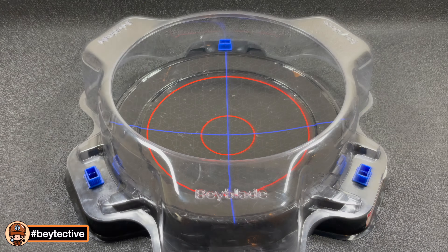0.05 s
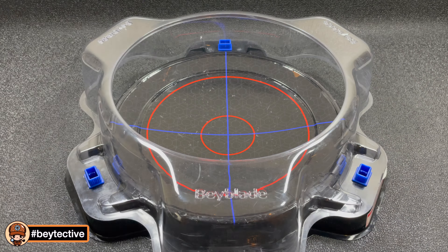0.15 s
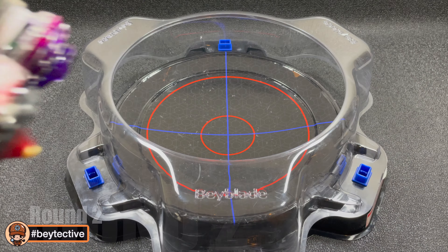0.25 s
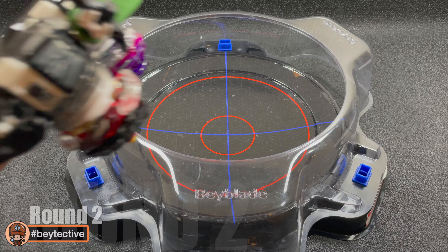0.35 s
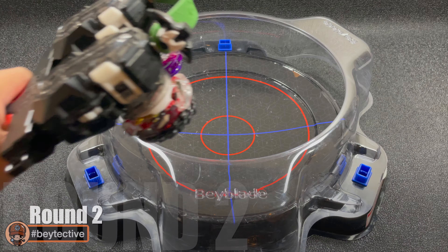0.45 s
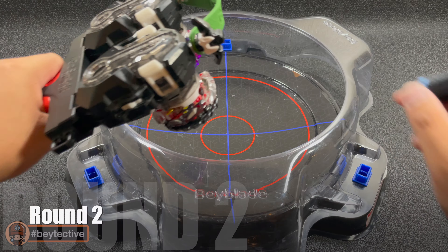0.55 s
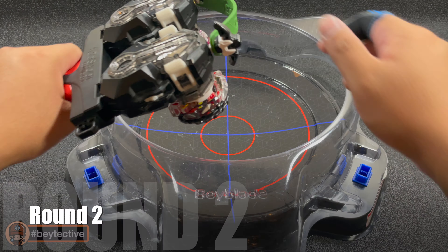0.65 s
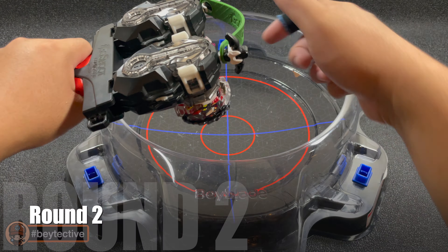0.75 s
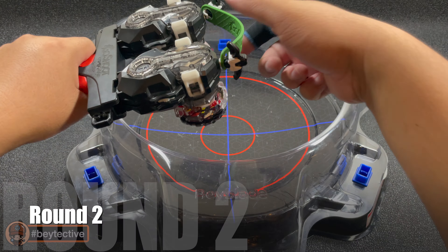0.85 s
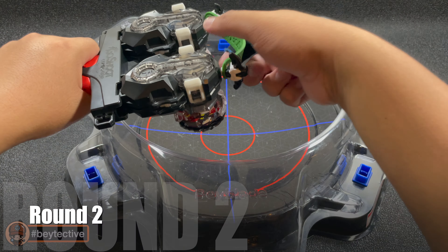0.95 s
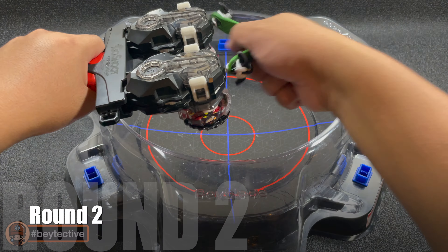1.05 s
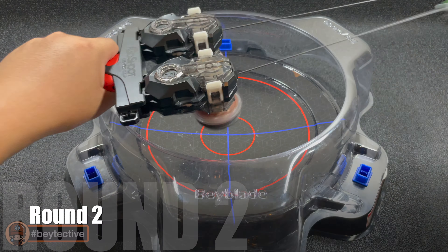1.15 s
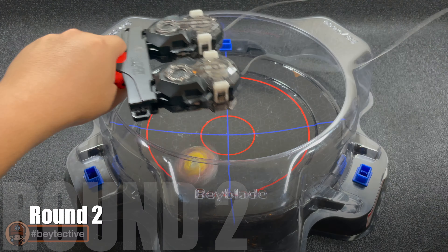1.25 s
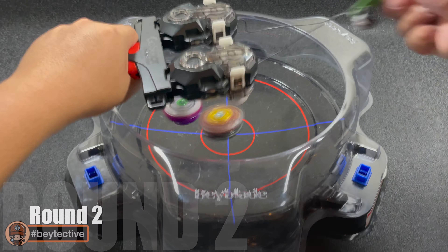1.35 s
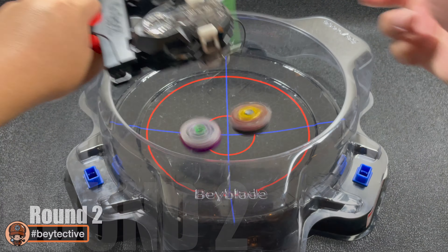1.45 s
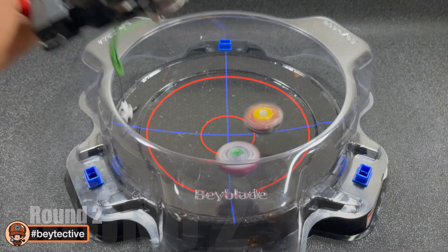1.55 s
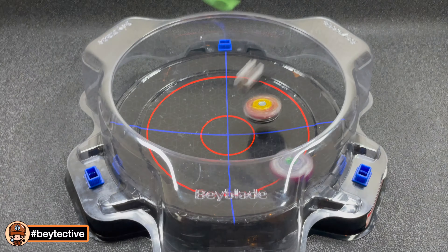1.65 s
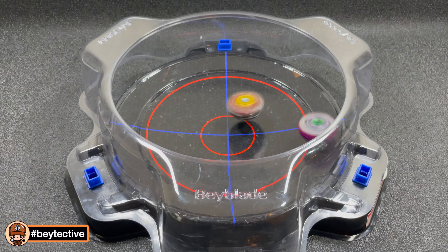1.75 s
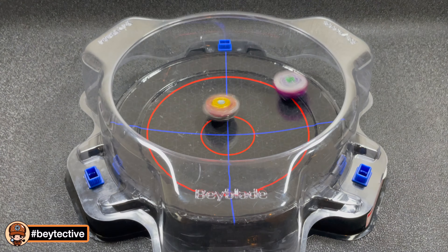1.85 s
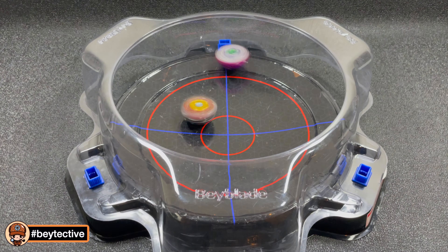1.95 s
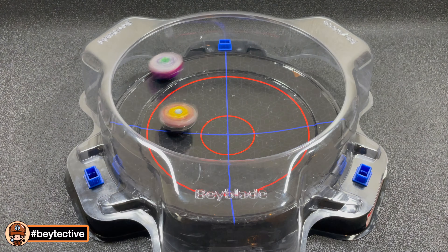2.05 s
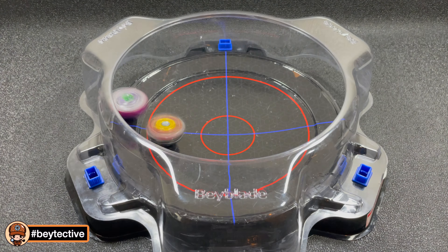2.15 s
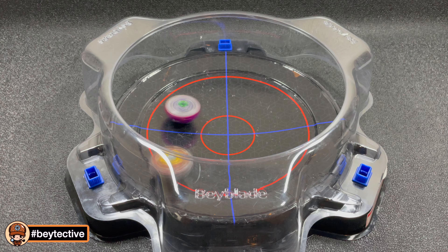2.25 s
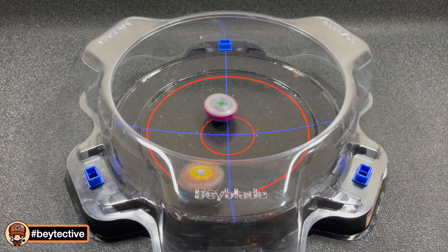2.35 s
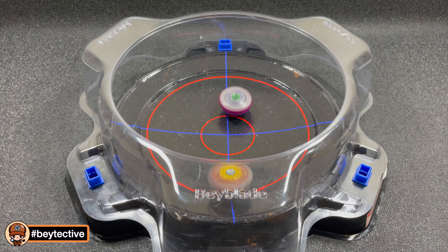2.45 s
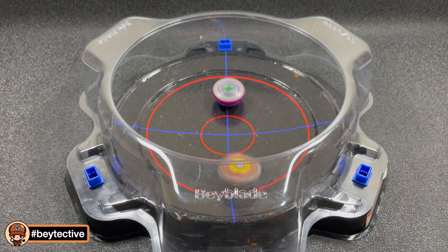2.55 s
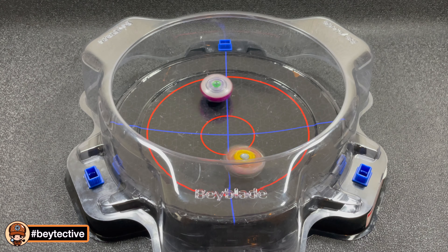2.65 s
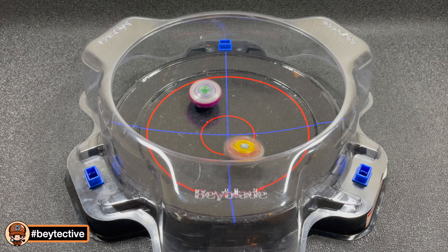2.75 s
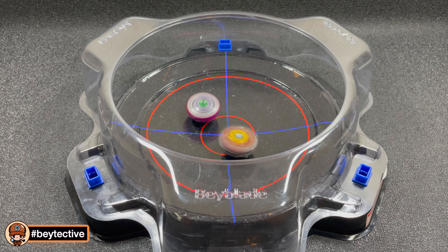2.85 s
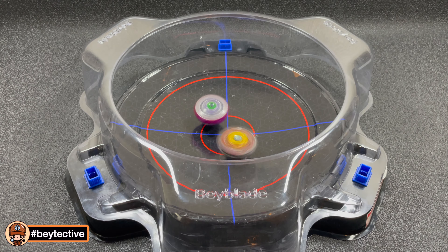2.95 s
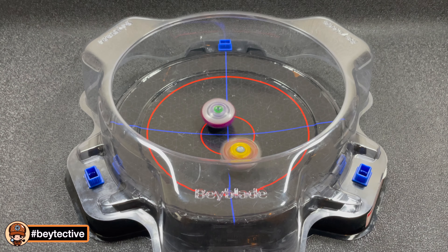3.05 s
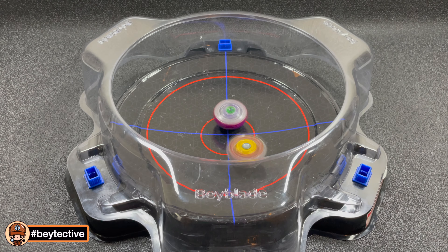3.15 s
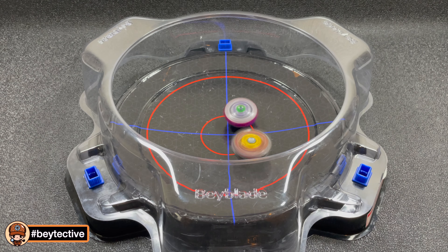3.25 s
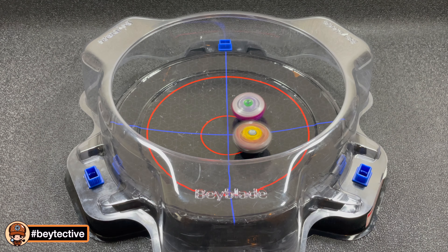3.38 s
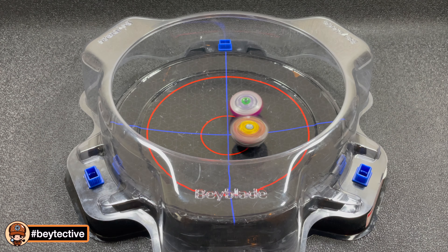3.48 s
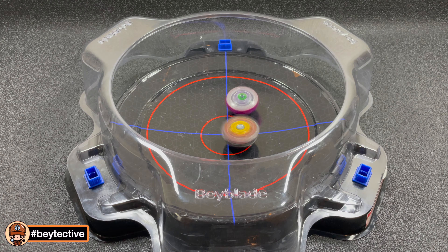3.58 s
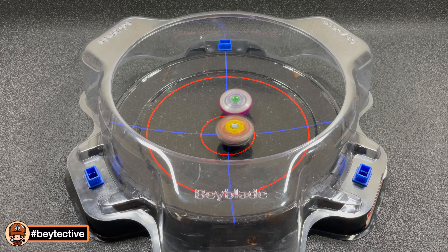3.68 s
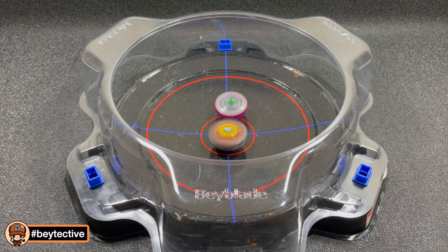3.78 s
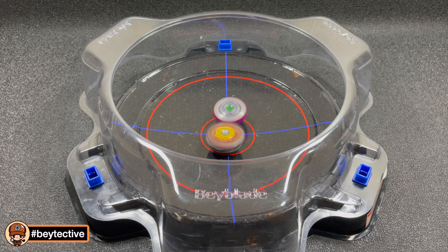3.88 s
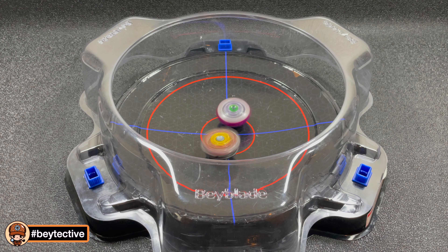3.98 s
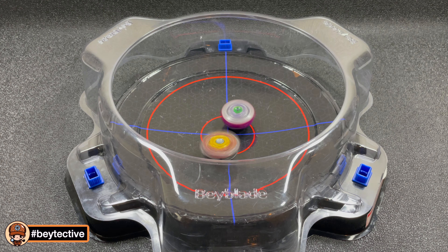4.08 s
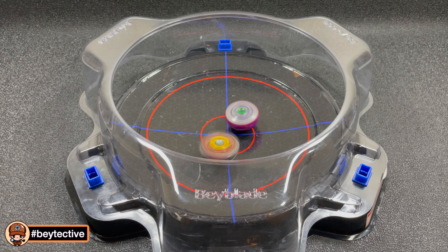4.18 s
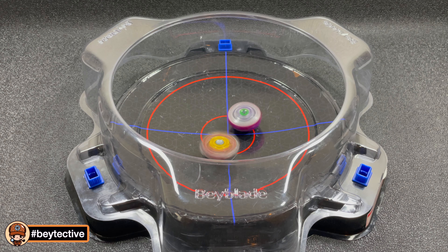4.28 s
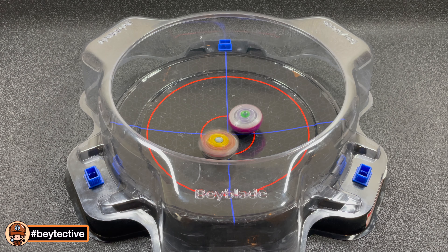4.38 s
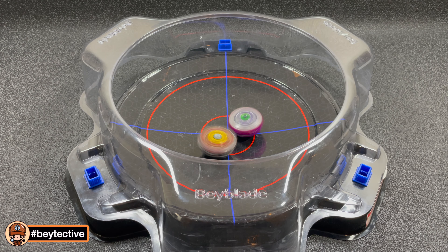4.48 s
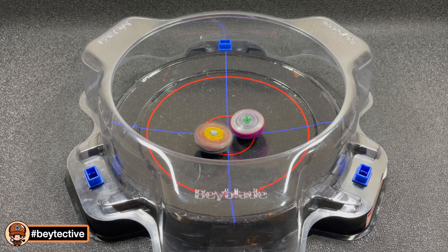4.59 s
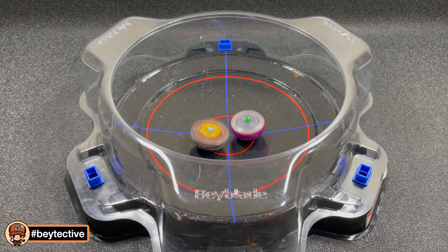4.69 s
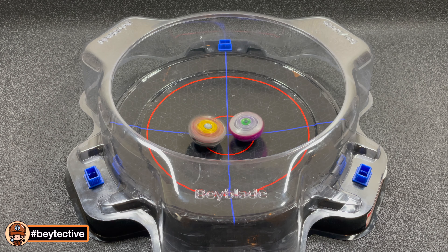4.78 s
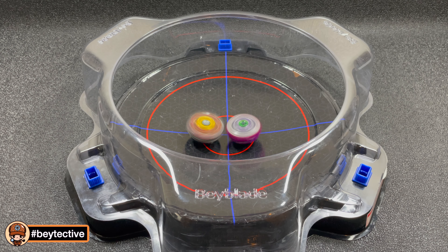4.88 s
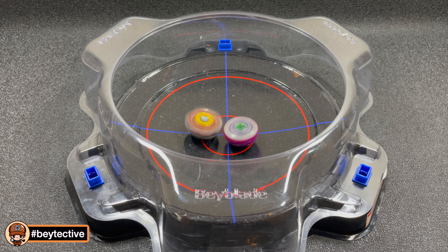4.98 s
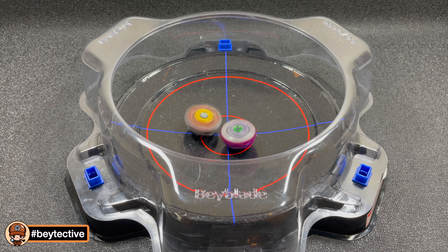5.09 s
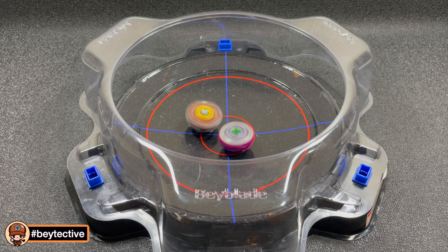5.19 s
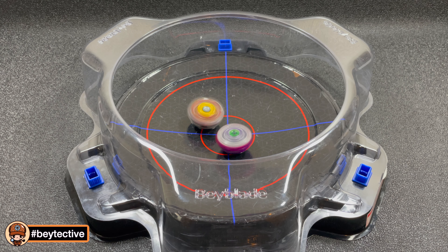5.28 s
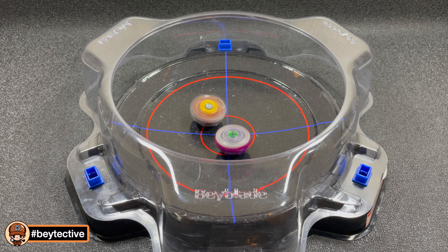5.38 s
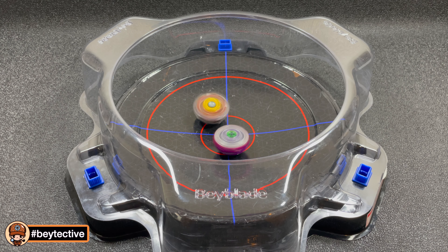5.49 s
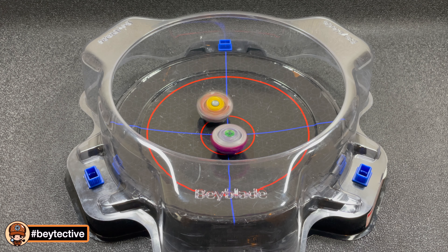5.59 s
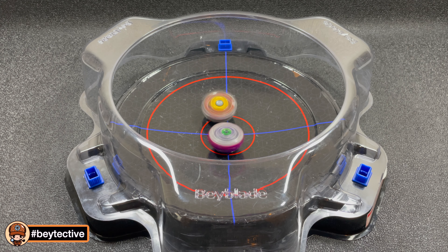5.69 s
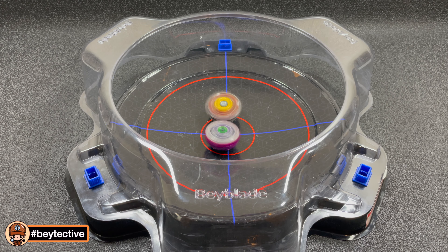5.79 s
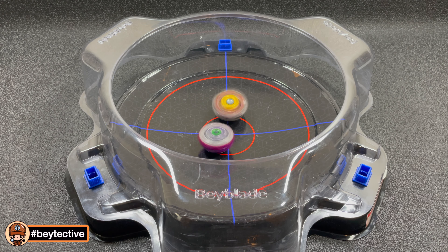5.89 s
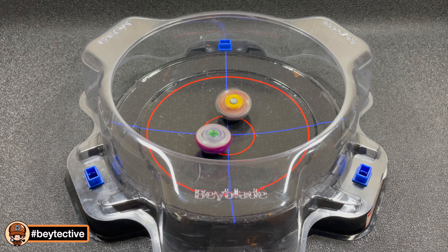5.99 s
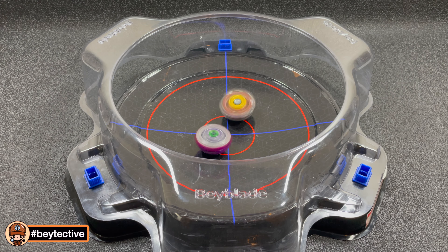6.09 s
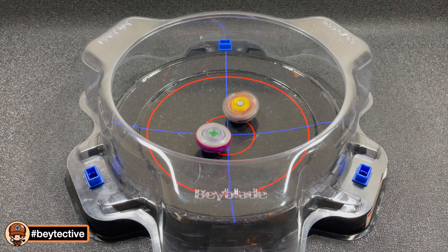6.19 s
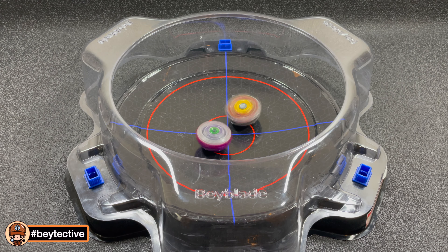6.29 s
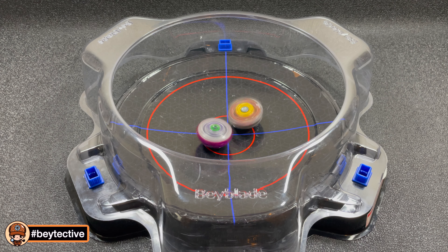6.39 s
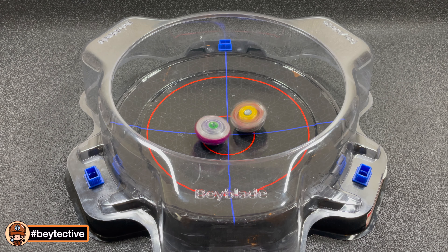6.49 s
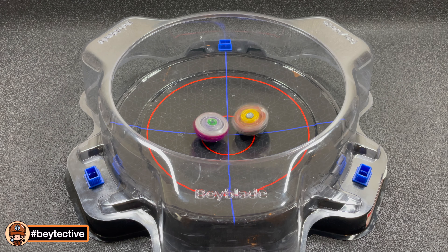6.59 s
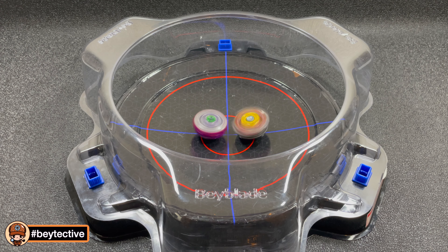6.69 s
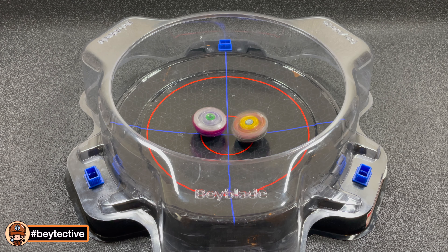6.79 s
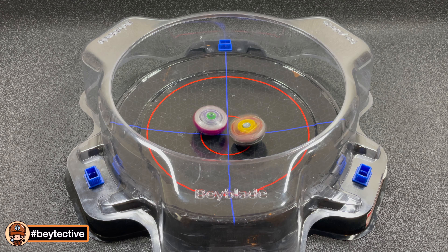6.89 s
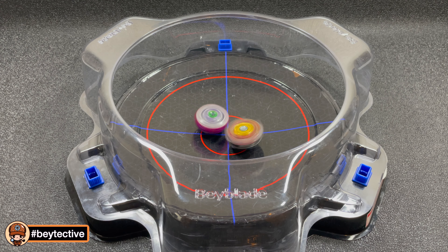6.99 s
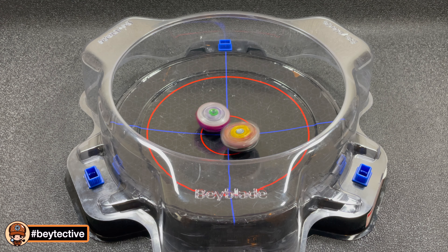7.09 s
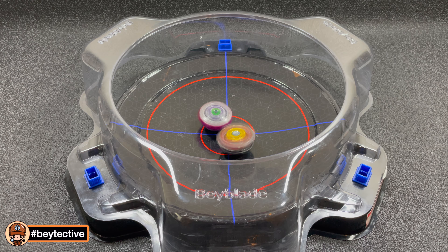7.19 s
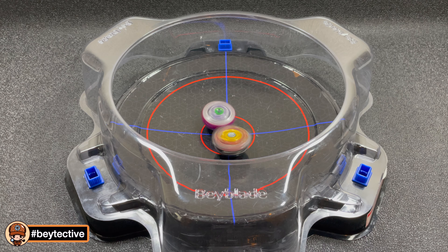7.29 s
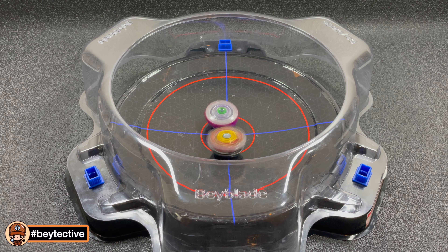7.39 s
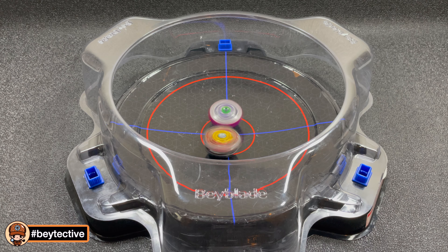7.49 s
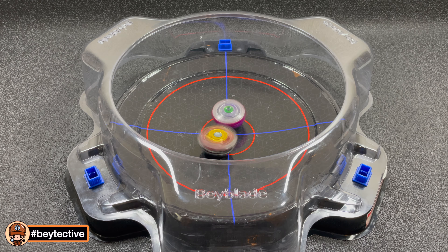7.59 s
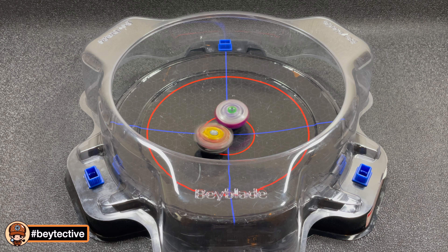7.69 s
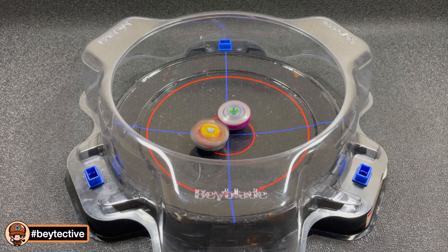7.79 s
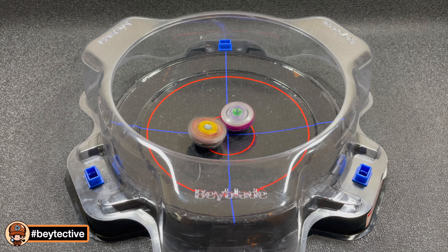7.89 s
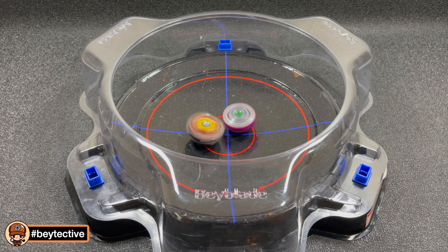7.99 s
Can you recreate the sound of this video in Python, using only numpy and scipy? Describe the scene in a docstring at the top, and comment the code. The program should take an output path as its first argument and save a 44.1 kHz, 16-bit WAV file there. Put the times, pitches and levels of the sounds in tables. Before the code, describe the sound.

After a short zipping rip of cord, spinning tops boom against plastic walls, then clash in bright metallic cracks that grow lighter over a low rumble.

```python
"""A few small plastic clicks, then two toy tops are ripped off a geared string launcher in a small room.
A spring winds the cord back as they land in a thin plastic arena, whose ringing modes boom at each knock.
The tops skid, rumble and scrape on tips that catch once a turn, and clack their metal rims together:
bursts of noise with a short ring, lighter on the whole as they slow. Faint air and hum lie beneath."""
import sys
import numpy as np
from scipy import signal
from scipy.fft import rfft, irfft
from scipy.io import wavfile
from scipy.ndimage import uniform_filter1d

SR = 44100
rng = np.random.default_rng(int(sys.argv[2]) if len(sys.argv) > 2 else 0)


def log_audio(samples):
    """Write samples as a 16-bit WAV file to the path given in sys.argv[1]."""
    # one column per channel
    frames = np.atleast_2d(samples).T
    # limit to full scale, then quantise
    limited = np.clip(frames, -1, 1)
    pcm = np.round(limited * 32767).astype(np.int16)
    wavfile.write(sys.argv[1], SR, pcm)


N = 354563
TIME = np.arange(N) / SR  # the whole scene, in seconds
RING = TIME[:SR // 4]  # the quarter second given to each blow


# rim against rim; the thump goes through the tips: start_s, crack_db, thump_db, ring_db, ring_hz
CLASHES = [(2.1873, -14.5, -43, -31, 6400), (2.9328, -17, -38.5, -33, 5870), (3.5217, -24, -38, -53, 4250),
           (3.7368, -25, -42.5, -35.5, 4460), (3.9235, -23.5, -49.5, -33, 5110),
           (4.5574, -28, -39.5, -37, 4300), (4.9263, -35.5, -60.5, -47.5, 4244),
           (5.838, -24.5, -47, -33.5, 4576), (6.462, -28.5, -44, -43.5, 4730),
           (6.9805, -31.5, -50.5, -43, 5640), (7.3181, -35.5, -80, -47, 5460),
           (7.3654, -38.5, -65, -61, 5000), (7.449, -35.5, -65, -55, 5020), (7.879, -32, -52, -49, 4710),
           (7.9287, -42.5, -68, -55.5, 4890), (7.9885, -36.5, -52, -46, 4760)]
# spectrum of the metal crack: pitch_hz, level_db
CLASH_COLOUR = [(150, -11), (450, -8.5), (750, -7.5), (1300, -8.5), (2200, -7), (3100, -8), (4700, 0.5),
                (6200, -1), (7600, -3), (10300, -0.5), (12000, -1), (14000, -2.5), (16000, -9.5)]


def clashes():
    """Metal rims meet: a bright crack, a brief ring of the rim, and a thump down the tips into the floor."""
    out = np.zeros(N)
    for start_s, crack_db, thump_db, ring_db, ring_hz in CLASHES:
        # the first touch is the hardest
        first_touch = 1 + 0.34 * fade(t60=0.0067, hold=0.00083)
        contact = burst(t60=0.056, hold=0.00081) * first_touch
        crack = attack(colour(contact * push(grind_s=0.0011), CLASH_COLOUR))
        rim_modes = burst(t60=0.074) + undb(-18) * burst(t60=.16)
        ring = attack(narrow(rim_modes, ring_hz, width_hz=650))
        thump = shell(centre_hz=470, width_hz=130, grind_s=0.0038)
        add(out, start_s, undb(crack_db) * crack + undb(ring_db) * ring + undb(thump_db) * thump)
    return out


# a top against the arena floor or wall; centre and width pick the shell modes that boom:
# start_s, boom_db, centre_hz, width_hz, crack_db, grind_s
KNOCKS = [(1.277, -20.5, 380, 200, -30, .002), (1.306, -18.5, 319.3, 200, -27, .008),
          (1.512, -39, 1160, 800, -21.5, .002), (1.522, -22, 392, 197, -30, .003),
          (1.533, -27.5, 520, 309.3, -24.5, .003), (1.582, -21.5, 693, 306.4, -22, .002),
          (1.666, -37.5, 775, 498, -33.5, .006), (1.692, -30.5, 345.3, 160, -35.5, .004),
          (1.77, -40, 250.9, 410.3, -40, .005), (1.803, -38, 491.2, 300, -39.5, .004),
          (1.865, -35.5, 413.3, 197.4, -34.5, .005), (1.931, -34.5, 515.8, 303.1, -35, .003),
          (2.017, -14.5, 698.5, 60, -19.5, .012), (2.029, -19, 660, 80.8, -21.5, .003),
          (2.149, -17.5, 831, 296.4, -18, .005), (2.156, -21.5, 620, 130, -25.5, .005),
          (2.158, -21, 1110, 91.2, -26.5, .004), (2.171, -19.5, 543.8, 70, -27.5, .006),
          (2.309, -39.5, 330, 400, -37.5, .008), (2.347, -46.5, 400, 400, -42.5, .004),
          (2.403, -40, 297, 304, -41.5, .005), (2.437, -37.5, 390, 300, -43.5, .005),
          (3.012, -35.5, 240, 140, -36.5, .004)]
# spectrum of the crack of a rim on plastic: pitch_hz, level_db
CRACK_COLOUR = [(100, -12), (500, 2), (1500, 1), (2800, 1), (4500, 3), (6000, -2.5), (7500, -9),
                (11000, -10.5), (16000, -21.5)]


def knocks():
    """A spinning rim grinds on the shell for a moment: a noisy crack, and a boom of the modes near one pitch."""
    out = np.zeros(N)
    for start_s, boom_db, centre_hz, width_hz, crack_db, grind_s in KNOCKS:
        # the blades chatter as they sweep past, 400 times a second
        blades = undb(1.8 * np.cos(2 * np.pi * 400 * RING))
        contact = burst(t60=0.051, hold=grind_s) * blades * push(grind_s)
        crack = attack(colour(contact, CRACK_COLOUR))
        boom = shell(centre_hz, width_hz, grind_s)
        add(out, start_s, undb(boom_db) * boom + undb(crack_db) * crack)
    return out


# modes of the arena shell, levels before the place of the blow weighs them: pitch_hz, level_db, t60_s
SHELL_MODES = [(69, -8.5, .25), (119.5, 2, .22), (169, -4.5, .18), (235, -4, 0.31), (302, -3, .15),
               (362, -5.5, .12), (389, -0.5, .14), (460, -5.5, 0.16), (513, 1, 0.18), (570, -0.5, 0.24),
               (687, -4, .13), (650, -8.5, 0.034), (822, 4, .14), (910, 2, .08), (1044, -6.5, 0.056),
               (1073, 1, 0.19), (1100, 3.5, 0.36), (1320, -8, 0.041), (1580, 1, .09), (1850, -9.5, .08),
               (2070, -7.5, .07), (2710, -4, 0.21)]


def shell(centre_hz, width_hz, grind_s):
    """The arena rings after a blow; the place of the blow favours the modes near one pitch."""
    ring = 0
    for hz, db, t60 in SHELL_MODES:
        share = undb(db) / (1 + abs((hz - centre_hz) / width_hz) ** 2.0)
        detuned_hz = hz * (1 + 0.0068 * rng.standard_normal())
        swing = np.sin(2 * np.pi * (detuned_hz * RING + rng.random()))
        ring = ring + share * swing * fade(t60)
    # the shell is driven harder for as long as the top presses on it
    drive = push(grind_s) * (1 + 3.5 * fade(t60=0.023, hold=grind_s))
    return attack(ring * drive)


def push(grind_s):
    """Contact force that builds up as a rim digs in."""
    return 1 - np.exp(-RING / (0.19 * grind_s))


# a top leans over and rubs for a while: rough scrape, high singing rub, drone of its body:
# start_s, length_s, scrape_db, sing_db, drone_db
RUBS = [(1.584, 0.14, -66, -52.5, -61), (1.956, .05, -47, -48, -61), (2.291, 0.16, -52, -56.5, -60.5),
        (2.612, 0.027, -58.5, -67, -76), (2.75, 0.25, -65.5, -72.5, -86), (3.183, .14, -77, -72, -67.5),
        (3.364, 0.14, -78, -64, -79), (4.13, .09, -81.5, -71.5, -80), (4.271, 0.12, -83.5, -73.5, -95),
        (5.069, 0.16, -93, -90, -86), (5.932, 0.12, -78, -75, -91), (6.7, .07, -90.5, -87, -76),
        (7.13, 0.05, -86, -77, -79), (7.62, 0.17, -96.5, -91, -100)]
RUB_ATTACK_S, RUB_RELEASE_S = .025, .035
# resonances of a scraping top: pitch_hz, width_hz, level_db
TOP_RESONANCES = [(3040, 290, -3.5), (4586, 350, 5), (6008, 300, 3.5), (9250, 770, -3.5),
                  (12200, 1100, -11), (13505, 900, -16.5)]
# high resonances of a singing top: pitch_hz, width_hz, level_db
SING_RESONANCES = [(3786, 170, -12.5), (4830, 280, 0), (5350, 200, -3)]
# lower resonances of a droning top: pitch_hz, width_hz, level_db
DRONE_RESONANCES = [(1560, 88, -0.5), (3230, 360, -11)]
SPIN_HZ, SPIN_DOWN_S = 85, 11.5  # turns per second at time zero, and the time to fall to 1 / e
# share of a turn in which a catch falls to 1 / e, and how far catches differ either way
CATCH_TURNS, CATCH_SCATTER_DB = 0.3, 5
SCRAPE_DB, SCRAPE_POWER = -61.5, 1.27  # at full travel speed; dies away faster than the rumble
FLUTTER_DB = 4.5  # the scrape comes and goes as the tops wobble


def tips():
    """The tips catch once a turn, never twice alike; a leaning top scrapes harder, sings and drones."""
    scraping, singing, droning = undb(SCRAPE_DB) * travel() ** SCRAPE_POWER, 0, 0
    for start_s, length_s, scrape_db, sing_db, drone_db in RUBS:
        lean = spell(start_s, length_s, RUB_ATTACK_S, RUB_RELEASE_S)
        scraping = scraping + undb(scrape_db) * lean
        singing = singing + undb(sing_db) * lean
        droning = droning + undb(drone_db) * lean
    spin_hz = SPIN_HZ * np.exp(-TIME / SPIN_DOWN_S) * (1 + 0.03 * walk(23))
    turns = np.cumsum(spin_hz) / SR
    # one random strength for each whole turn
    catch_db = CATCH_SCATTER_DB * rng.uniform(-1, 1, N)[turns.astype(int)]
    catch = np.exp(-(turns % 1) / CATCH_TURNS) * undb(catch_db)
    friction = grit(per_s=2600, scatter_db=4.5) * (0.19 + catch)
    flutter = undb(FLUTTER_DB * np.tanh(walk(25)))
    scrape = unit((body(friction, TOP_RESONANCES) + undb(-15) * friction) * flutter)
    sing = unit(body(friction, SING_RESONANCES))
    drone = unit(body(friction, DRONE_RESONANCES))
    return scrape * scraping + sing * singing + drone * droning


# rumble of the shell, which follows how fast the tops travel: start_s, level_db
TRAVEL = [(1.4, -61), (1.69, -49.5), (2.31, -47.5), (2.58, -59), (2.9, -55.5), (4.28, -72.5), (5.38, -84.5),
          (7.06, -76.5), (7.82, -82), (8.04, -71)]
LANDING_S = 1.27
FAST_DB = -48.5  # rumble at full travel speed


def travel():
    """Travel speed of the tops: nothing until they land, about 1 while they race round the wall."""
    landed = np.clip((TIME - LANDING_S) / 0.072, 0, 1)
    return undb(curves(TRAVEL)[0] - FAST_DB) * landed


# spectrum of the rolling rumble: pitch_hz, level_db
ROLL_COLOUR = [(60, -5.5), (150, -3), (240, -0.5), (420, -2.5), (650, -15.5), (1200, -17.5), (2500, -21),
               (6000, -42.5)]
# low sway at full travel speed, how steeply it follows the speed, and how long it lags
SWAY_DB, SWAY_POWER, SWAY_LAG_S = -44.5, 1.35, .16
LANDING_DB = -39
# a clash flings the tops up the slope, and the shell sways a moment later: the harder the clash, the more
REBOUND_DELAY_S, REBOUND_WIDTH_S = 0.13, 0.05
REBOUND_DB, REBOUND_POWER = -21.5, 1.4  # level for a crack of 0 dB, and dB per dB of crack


def rolling():
    """The shell rumbles and sways under the tips, and heaves at the landing and after clashes."""
    speed = travel()
    rumble = unit(colour(grit(per_s=750, scatter_db=3.5), ROLL_COLOUR)) * undb(FAST_DB) * speed
    sway = undb(SWAY_DB) * np.interp(TIME - SWAY_LAG_S, TIME, speed) ** SWAY_POWER
    landing = undb(LANDING_DB) * spell(LANDING_S, .25, attack_s=0.0058, release_s=0.13)
    rebound = np.zeros(N)
    swell = np.exp(-((RING - REBOUND_DELAY_S) / REBOUND_WIDTH_S) ** 2)
    for start_s, crack_db, *_ in CLASHES:
        add(rebound, start_s, undb(REBOUND_DB + REBOUND_POWER * crack_db) * swell)
    heave = np.sqrt(sway ** 2 + landing ** 2 + rebound ** 2)
    sway_hz = 36 + 3 * walk(29)
    return rumble + np.sin(2 * np.pi * np.cumsum(sway_hz) / SR) * heave


# the rims barely brush each other: start_s, level_db, length_s
GRAZES = [(4.895, -73, .004), (5.373, -74, .027), (6.227, -58, .005), (6.26, -56, 0.016),
          (7.17, -77.5, .02)]
# resonances of a lightly touched rim: pitch_hz, width_hz, level_db
RIM_RESONANCES = [(2480, 310, -1.5), (3200, 200, 8), (3570, 320, 2), (4730, 900, -9.5)]
GRAZE_HISS_DB = -4  # gain of the hiss before the whole touch is levelled


def grazes():
    """A passing touch sets the rim ringing, with a little hiss."""
    out = np.zeros(N)
    for start_s, level_db, length_s in GRAZES:
        touch = burst(t60=.015, hold=length_s)
        hiss = undb(GRAZE_HISS_DB) * colour(touch, CORD_COLOUR)
        add(out, start_s, undb(level_db) * attack(body(touch, RIM_RESONANCES) + hiss))
    return out


# spectrum of the cord and gears, shared by the clicks and the graze hiss: pitch_hz, level_db
CORD_COLOUR = [(120, -59), (200, -22), (278, -24.5), (316, -29.5), (821, -11.5), (986, -14), (1320, -11),
               (2380, -10), (3620, -2.5), (6280, -6.5), (7410, -11.5), (11300, -11.5), (16000, -23.5)]
# the cord speeds up evenly until it lets go, then the gears coast to rest
PULL_S, LET_GO_S, COAST_S = 1.094, 1.21, .02
PULL_DB, TEETH_HZ, SPEED_POWER = -28, 1005.5, .6  # at full speed; loudness grows as a power of the speed
# a spring winds the cord back
REWIND_S, REWIND_LENGTH_S, REWIND_DB, REWIND_TEETH_HZ = 1.27, .25, -46, 796


def launcher():
    """The cord whirls a gear train: a scratch of noise for every tooth, and a low shudder of the housing."""
    speed = spell(LET_GO_S, 0, LET_GO_S - PULL_S, COAST_S)
    rewind = spell(REWIND_S, REWIND_LENGTH_S, attack_s=.04, release_s=.08)
    teeth_hz = np.maximum(TEETH_HZ * speed, REWIND_TEETH_HZ * rewind)
    tooth = np.cumsum(teeth_hz * (1 + .06 * walk(150))) / SR % 1  # place within the current tooth
    scratch = 0.44 + np.exp(-tooth / 0.3)
    rasp = rng.standard_normal(N) * scratch * undb(1.1 * walk(250))
    housing = unit(narrow(rasp, 86, width_hz=98)) * undb(-29.5)
    strength = np.hypot(undb(PULL_DB) * speed ** SPEED_POWER, undb(REWIND_DB) * rewind)
    return (unit(colour(rasp, CORD_COLOUR)) + housing) * strength


# small plastic clicks and scuffs: start_s, level_db, pitch_hz, length_s
CLICKS = [(0.077, -88.5, 4060, 0.2), (0.411, -79, 4200, 0.0044), (0.482, -72.5, 4400, 0.0027),
          (1.061, -54.5, 6020, .035), (1.074, -40.5, 3590, 0.0017), (1.213, -25, 3930, .0005),
          (1.414, -44.5, 8000, 0.0016), (1.985, -35.5, 4570, 0.018), (3.914, -37.5, 5000, 0.0072)]


def clicks():
    """Light plastic parts snap together or brush past each other."""
    out = np.zeros(N)
    for start_s, level_db, pitch_hz, length_s in CLICKS:
        touch = colour(burst(t60=0.011 + length_s, hold=length_s), CORD_COLOUR)
        add(out, start_s, undb(level_db) * attack(resonate(touch, pitch_hz, width_hz=2200)))
    return out


def inner_echoes(x):
    """Quick echoes inside the arena wall: a very short burst of dense reflections."""
    response = burst(t60=0.06)
    return signal.fftconvolve(x, response / np.linalg.norm(response))[:N]


# reverberation time of the room: pitch_hz, t60_s
ROOM_T60 = [(150, 0.37), (600, 0.22), (2000, 0.3), (4700, 0.31), (9000, .31), (16000, 0.2)]


def reverb(x):
    """The room's tail: noise in octave bands, the lowest lasting longest and the highest dying first."""
    t = TIME[:SR // 2]
    noise = rfft(rng.standard_normal(len(t)))
    hz = np.arange(len(noise)) * SR / len(t)
    octave = np.log2(np.clip(hz, 125, 16000) / 125)
    tail = 0
    for k in range(8):
        band = irfft(noise * np.maximum(1 - abs(octave - k), 0), len(t))
        tail = tail + band * np.exp(-np.log(1000) * t / at_hz(ROOM_T60, 125 * 2 ** k))
    tail = tail * np.clip((t - .004) / .012, 0, 1)  # a short gap before the tail swells in
    return signal.fftconvolve(x, tail / np.linalg.norm(tail))[:N]


# spectrum of the air: pitch_hz, level_db
ROOM_COLOUR = [(20, -3.5), (60, -0.5), (100, -8.5), (170, -10), (260, -16), (500, -18.5), (900, -16.5),
               (1400, -23), (2500, -29.5), (6000, -35.5), (16000, -38.5)]
ROOM_DB = -75
# resonances of the low hum, relative levels: pitch_hz, width_hz, level_db
HUM = [(57, 15, 1), (111, 12, 1), (161, 15, -7.5)]
# level of the whole hum: start_s, level_db
HUM_LEVEL = [(0, -71.5), (.9, -81), (2, -70), (5.3, -68.5), (8.04, -69.5)]


def room_tone():
    """Faint air as coloured noise, and a low hum of narrow noise bands that dips early and comes back."""
    air = unit(colour(rng.standard_normal(N), ROOM_COLOUR)) * undb(ROOM_DB + .6 * walk(3))
    hum = body(rng.standard_normal(N), HUM)
    return air + unit(hum) * undb(curves(HUM_LEVEL)[0])


def body(x, resonances):
    """Pass a contact force or noise through a table of resonances."""
    return sum(undb(db) * narrow(x, hz, width_hz) for hz, width_hz, db in resonances)


def narrow(x, hz, width_hz):
    """A resonance with steep skirts."""
    return resonate(resonate(x, hz, width_hz), hz, 3 * width_hz)


def resonate(x, hz, width_hz):
    """One resonance, gain 1 at its centre."""
    return signal.lfilter(*signal.iirpeak(hz, hz / width_hz, fs=SR), x)


def colour(x, points, size=4096):
    """Causal filter with the given (Hz, dB) spectrum."""
    gain = undb(at_hz(points, np.arange(size // 2 + 1) * SR / size))
    # folding the cepstrum forward gives minimum phase
    cepstrum = irfft(np.log(gain))
    cepstrum[1:size // 2] *= 2
    cepstrum[size // 2 + 1:] = 0
    response = irfft(np.exp(rfft(cepstrum)))
    return signal.fftconvolve(x, response)[:len(x)]


def grit(per_s, scatter_db):
    """Tiny slips of unequal size at random moments."""
    sizes = undb(scatter_db * np.minimum(rng.exponential(size=N), 2))
    return unit((rng.random(N) < per_s / SR) * sizes * rng.choice([-1, 1], N))


def burst(t60, hold=0):
    """Countless overlapping modes dying together."""
    return rng.standard_normal(len(RING)) * fade(t60, hold)


def fade(t60, hold=0):
    """Envelope that holds, then dies by 60 dB in t60."""
    return np.exp(-np.log(1000) * np.maximum(RING - hold, 0) / t60)


def spell(s, length_s, attack_s, release_s):
    """Envelope that is fully up at time s, holds, then dies away."""
    rise = np.clip(1 + (TIME - s) / attack_s, 0, 1)
    return rise * np.exp(-np.maximum(TIME - s - length_s, 0) / release_s)


def walk(rate):
    """Slow chance with a spread near 1, drawn anew at the given rate in Hz."""
    k = int(SR / rate)
    steps = np.repeat(rng.standard_normal(N // k + 1), k)
    return unit(uniform_filter1d(steps, k)[:N])


def curves(table):
    """Each column of a table, joined by straight lines in time."""
    s, *columns = np.transpose(table)
    return [np.interp(TIME, s, c) for c in columns]


def at_hz(points, hz):
    """Read (Hz, value) points on a log-frequency axis."""
    f, value = np.transpose(points)
    return np.interp(np.log(np.maximum(hz, 1)), np.log(f), value)


def undb(db):
    """Decibels to gain."""
    return 10 ** (np.asarray(db) / 20)


def unit(x):
    """Scale to rms 1."""
    return x / np.sqrt(np.mean(x ** 2))


def attack(x, size=256):
    """Scale a blow so that its loudest few milliseconds have rms 1."""
    return x / np.sqrt(uniform_filter1d(x ** 2, size, mode="constant").max())


def add(out, s, x):
    """Mix a sound in at time s."""
    i = int(s * SR)
    out[i:i + len(x)] += x[:N - i]


# how far the echoes spread to the sides: pitch_hz, level_db
SPREAD = [(40, 10.5), (90, 3.5), (200, 0), (700, -0.5), (1400, 1.5), (2800, -5.5), (5600, 2.5), (9500, 9.5),
          (14000, -4)]


def scene():
    """The arena stands almost straight ahead; its echoes and the room tone spread to the sides."""
    plastic = knocks() + clicks() + grazes() + launcher() + tips() + rolling()
    direct = plastic + clashes()
    # a clash radiates a different mix of modes towards each wall, so its tail is dense and even
    walls = sum(reverb(plastic + clashes()) for _ in range(2))
    mid = direct + undb(-20.0) * inner_echoes(direct) + undb(-12.0) * walls + room_tone()
    side = colour(undb(-16) * inner_echoes(direct) + undb(-21.5) * reverb(direct), SPREAD)
    side = side + .035 * direct + undb(-11.0) * room_tone()
    return np.array([mid + side, mid - side])


def record(dry):
    """A steep low-pass cuts the top above 16 kHz."""
    return signal.sosfilt(signal.ellip(8, .2, 70, 16000, fs=SR, output="sos"), dry)


dry = scene()
out = record(dry)
log_audio(out)
```